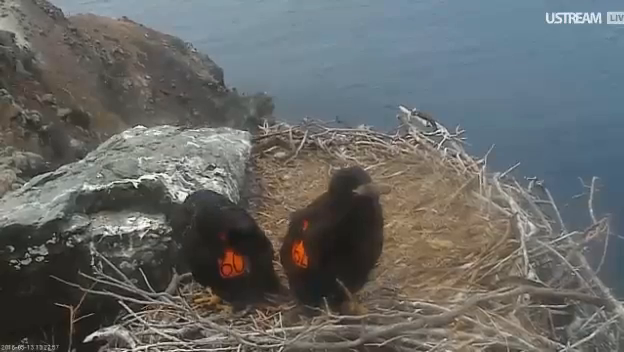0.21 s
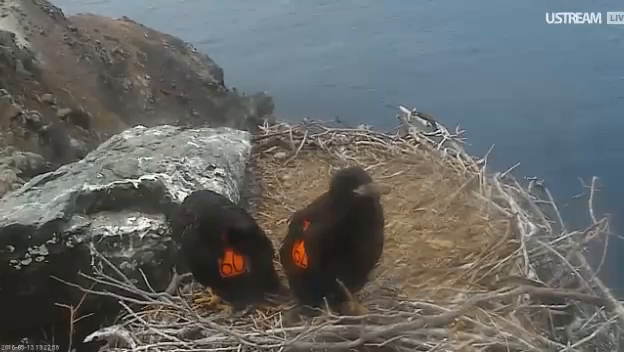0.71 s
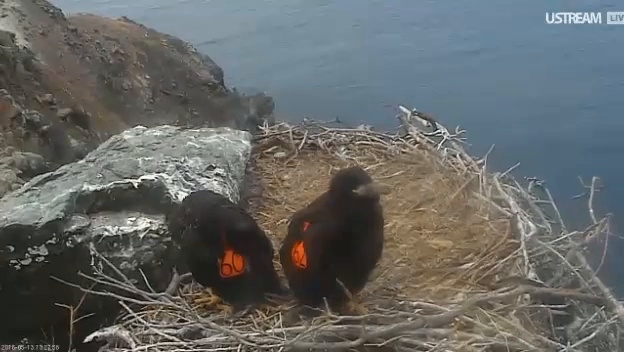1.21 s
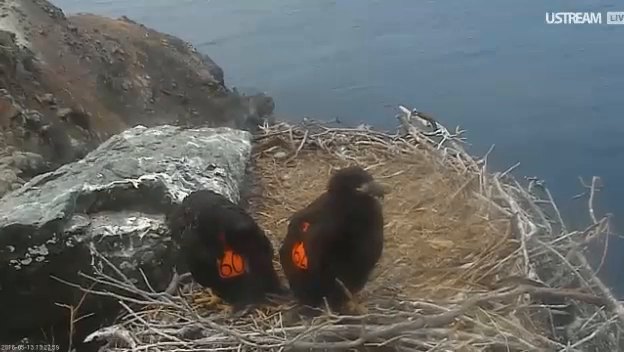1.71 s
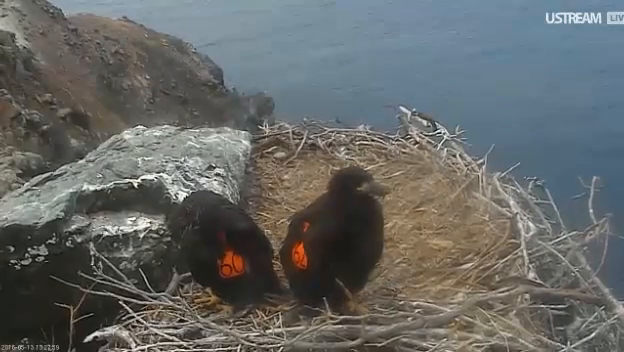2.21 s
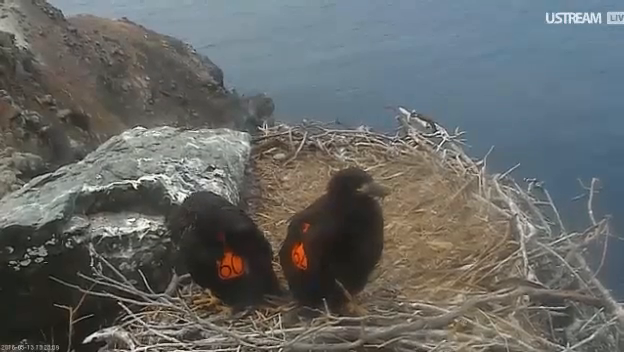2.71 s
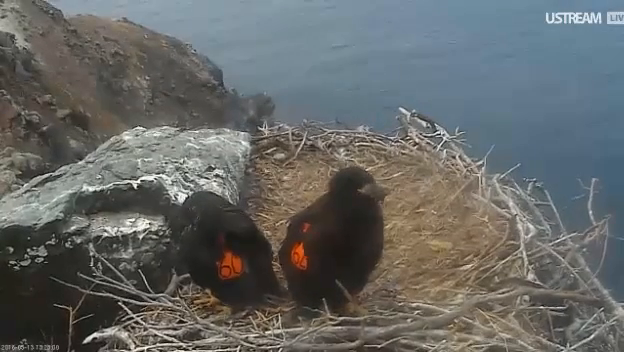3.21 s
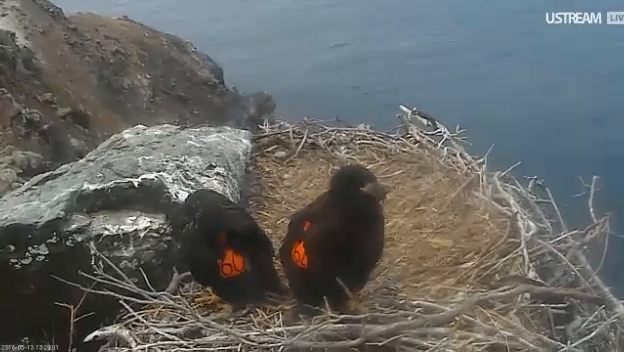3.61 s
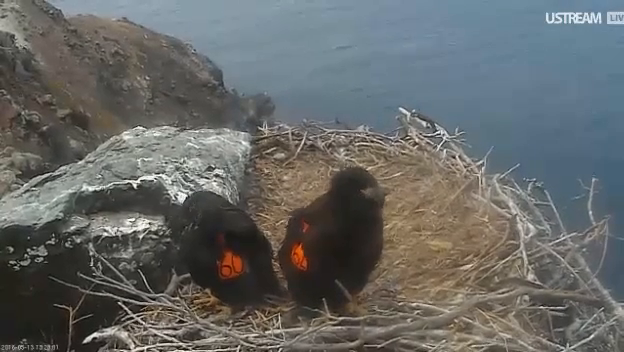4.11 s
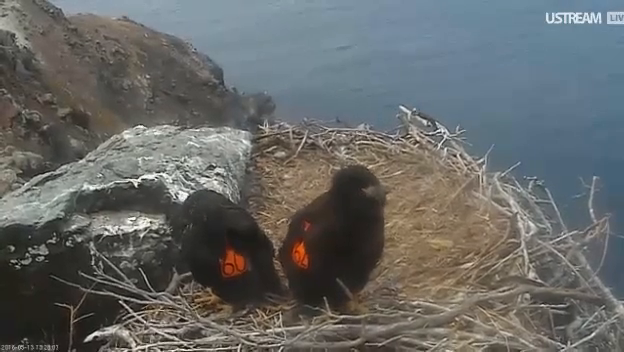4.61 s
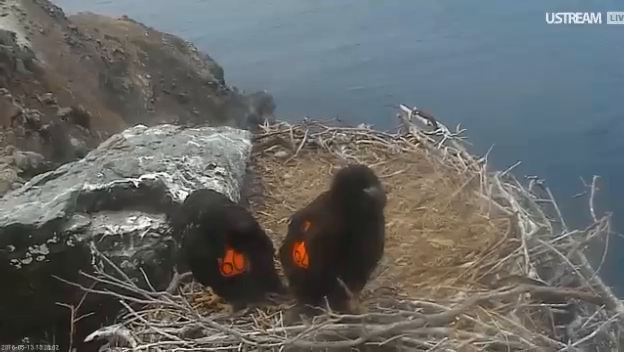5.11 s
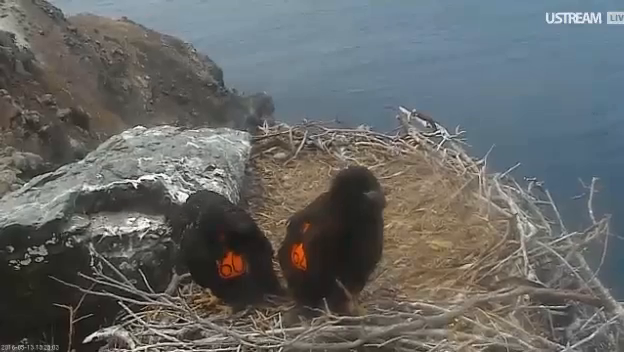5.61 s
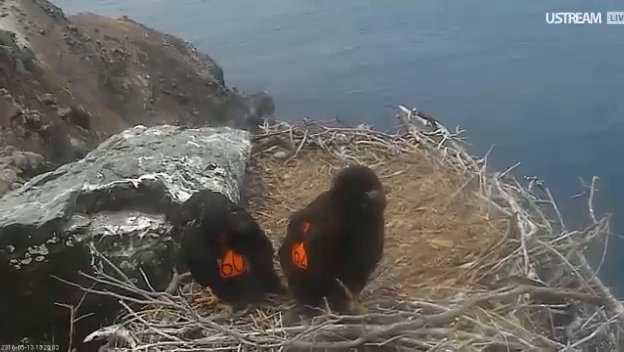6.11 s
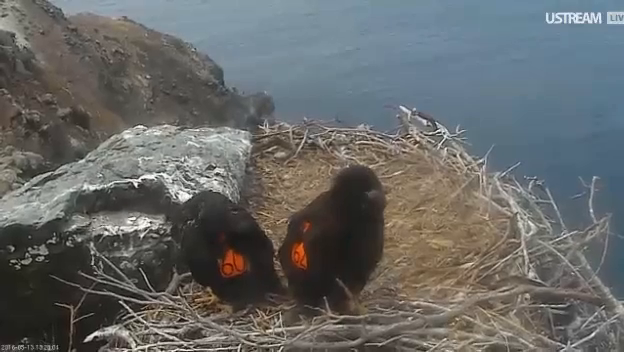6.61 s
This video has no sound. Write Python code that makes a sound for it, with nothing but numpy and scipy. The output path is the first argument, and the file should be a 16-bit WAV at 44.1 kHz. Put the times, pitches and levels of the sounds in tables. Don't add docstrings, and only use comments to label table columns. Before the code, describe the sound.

A nearly silent line of soft low hiss is interrupted by brittle loose-contact crackles, densest in the first second, then scattered.

```python
import sys
import numpy as np
from scipy import signal
from scipy.fft import rfft, irfft, next_fast_len
from scipy.io import wavfile
from scipy.ndimage import uniform_filter1d

SR = 44100
rng = np.random.default_rng(int(sys.argv[2]) if len(sys.argv) > 2 else 0)


def master(y):
    cut = np.clip(np.atleast_2d(y).T, -1, 1)
    pcm = np.round(cut * 32767)
    wavfile.write(sys.argv[1], SR, pcm.astype(np.int16))


def level_to_linear(level):
    exponent = np.asarray(level, float) / 20
    return 10 ** exponent


N = 303849

# (frequency [Hz], density [dB per Hz])
HISS_SPECTRUM = [(4, -12.5), (9, 6), (24, 1), (60, -5.5), (170, -9.5), (480, -14), (10000, -30),
                 (13400, -53)]
HISS_DB = -61.5
SWELL_DB, SWELL_S, SWELL_HZ = 1.5, 0.3, 250

# (time [s], length [ms], level at 3-11 kHz [dB], level above [dB])
PUFFS = [(.28, 3, -49, -73), (.2845, 3, -58, -73), (0.2938, 4, -49, -85), (0.2975, 1.9, -58, -86),
         (.4407, 1, -60, -51), (.462, 2, -67.5, -72), (.527, 4, -57, -73), (.535, 10, -61, -86),
         (.5415, 1.5, -41.5, -55.5), (.5475, 2, -57, -68), (0.561, 6.1, -49, -91), (0.5644, 1.6, -49, -52),
         (0.572, 2, -49, -68), (.577, 3, -55, -75), (0.586, 7, -46, -95.5), (.622, 3, -57.5, -89),
         (1.7985, 3, -50, -57), (3.219, 6.5, -60, -61), (3.5286, 1, -77, -76), (3.785, 0.89, -60, -68),
         (3.8185, 2, -61, -74), (4.5385, 2.5, -57.5, -53.5), (4.567, 8, -52.5, -95.5),
         (5.8933, 1.12, -60, -64)]
# (time [s], length [ms], level at 1-3 kHz [dB])
DULL_PATCHES = [
    (.272, 7.4, -60),
    (.45, 12, -68),
    (.535, 10, -51),
    (.571, 5.9, -48),
    (.584, 14, -47),
    (.614, 13, -55),
    (3.231, 16, -63.5),
    (4.566, 6.8, -60.5),
    (5.905, 17, -61.5),
]

# (time [s], time held shut [ms])
TOUCHES = [
    (.24538, 39.61),
    (.42827, 12.45),
    (.47693, 129.39),
    (1.79113, 8.38),
    (3.15518, 66.13),
    (3.52857, 6.94),
    (3.7187, 3.47),
    (3.78497, 33.14),
    (4.51734, 42.3),
    (5.8806, 12.7),
]
# (time [s], time open [ms])
LIFTS = [(.25374, .26), (.25876, .62), (.28094, 2.59), (.42857, .145), (.47723, .19), (.4819, .345),
         (.50305, .6), (.50405, .034), (.59847, .19), (.6056, .02), (1.79524, .095), (1.79848, .1),
         (3.15663, .04), (3.15964, .66), (3.16057, .67), (3.21473, .175), (3.53375, .18), (3.80445, .39),
         (3.81775, .17), (4.52922, .3), (4.53195, .38), (4.54475, .54), (5.88082, .13), (5.88446, .16),
         (5.88514, .06), (5.88844, .98)]
# (time [s], time open [ms], time shut [ms], time open again [ms])
BOUNCED_LIFTS = [(.24589, .076, .4, .076), (.25742, .2, .37, .06), (.25964, .06, .4, .37),
                 (.27892, .146, .264, .76), (.28373, .11, .61, .12), (.56386, .07, .29, .23),
                 (.57456, .09, .35, .63), (.58961, .04, .4, 1.3), (.5964, .13, .55, .02),
                 (.60001, .02, .43, .32), (.60209, .03, .42, .15), (.60316, .025, .425, .11),
                 (1.79156, .07, .33, .14), (1.79434, .015, .37, .26), (1.79761, .11, .26, .22),
                 (3.16542, .14, .22, .06), (3.53424, .06, .03, .346), (3.53474, .1, .04, .1),
                 (3.53503, .043, .067, .33), (3.78646, .074, .274, .074), (3.8051, .15, .32, .1),
                 (4.54555, .056, .335, .056), (4.54635, .15, .34, 2.82), (4.54989, .095, .3, .095),
                 (4.55101, .05, .59, .05), (5.88574, .12, .29, .04), (5.88656, .205, .295, .13),
                 (5.8875, .03, .47, .19)]
# (time [s], number of breaks [count], mean spacing [ms], typical time open [ms])
CHATTER_RUNS = [(.47764, 14, .303, .058), (.48245, 12, .319, .05), (.48873, 9, .34, .06),
                (.49186, 13, .395, .052), (.49707, 14, .394, .063), (.50563, 8, .446, .05),
                (.51614, 9, .404, .065), (.52515, 9, .409, .06), (.547, 3, .42, .085),
                (.57588, 6, .396, .09), (.59393, 4, .397, .1), (1.79637, 4, .311, .082),
                (3.21513, 6, .31, .078), (3.217, 8, .316, .057), (3.21957, 5, .342, .068),
                (3.78534, 3, .308, .06), (4.51761, 9, .357, .064), (4.52075, 9, .336, .046),
                (4.52385, 8, .346, .063), (4.52972, 6, .38, .055), (4.53262, 11, .403, .055),
                (4.53825, 3, .435, .057), (4.5431, 4, .433, .06), (4.55284, 4, .397, .06),
                (4.5555, 5, .412, .06), (5.88122, 3, .476, .02), (5.88273, 4, .435, .025)]
FASTEST_MS = 0.3
SHUT_SPREAD, OPEN_SPREAD = 0.054, 0.19
SLACK = 1.0

# (edge [Hz], tail [share], tail corner [Hz], slow tail [share], slow tail corner [Hz])
BREAK_SHAPE = (10100, 2.0, 2900, .25, 200)
# (edge [Hz], tail [share], tail corner [Hz], slow tail [share], slow tail corner [Hz])
CLOSE_SHAPE = (8100, .24, 1250, .17, 115)
BREAK_DB, CLOSE_DB = -12.1, -5.5
FINE = 4


def hiss(hz):
    points_hz, points_db = np.transpose(HISS_SPECTRUM)
    colour = level_to_linear(np.interp(np.log(hz + 1), np.log(points_hz), points_db))
    spectrum = rfft(rng.standard_normal(next_fast_len(N))) * colour * (hz > 5)
    bass = irfft(spectrum / (1 + (hz / SWELL_HZ) ** 2))
    size = int(SWELL_S * SR)
    wander = uniform_filter1d(rng.standard_normal(len(bass)), size)
    wander = uniform_filter1d(wander, size)
    swell = level_to_linear(SWELL_DB * wander / np.std(wander))
    noise = irfft(spectrum) + bass * (swell - 1)
    return noise * level_to_linear(HISS_DB) / np.std(noise)


def band_noise(lo_hz, hi_hz, order=8):
    edges = signal.butter(order, [lo_hz, hi_hz], "band", fs=SR, output="sos")
    noise = signal.sosfilt(edges, rng.standard_normal(N))
    return noise / np.std(noise)


def humps(rows):
    t = np.arange(N) / SR
    envelope = np.zeros(N)
    for s, length_ms, db in rows:
        near = slice(int((s - 0.03) * SR), int((s + 0.03) * SR))
        half_lengths = 2000 * (t[near] - s) / length_ms
        envelope[near] += level_to_linear(db) * np.exp(-half_lengths ** 4)
    return envelope


def puffs():
    rows = np.array(PUFFS)
    middle = humps(rows[:, :3]) * band_noise(2900, 10200, order=12)
    top = humps(np.delete(rows, 2, axis=1)) * band_noise(10500, 13000, order=2)
    dull = humps(DULL_PATCHES) * band_noise(900, 3000)
    return middle + top + dull


def smear(x, reach_ms, db, noise):
    size = max(int(reach_ms * SR / 1000), 1)
    power = uniform_filter1d(x ** 2, size)
    power = uniform_filter1d(power, size, origin=size // 3)
    return level_to_linear(db) * np.sqrt(np.maximum(power, 0)) * noise


def chatter():
    start, open_ms = [], []
    chance = rng.standard_normal((len(CHATTER_RUNS), 30, 2))
    for (s, count, spacing_ms, typical_ms), draw in zip(CHATTER_RUNS, chance):
        loose = SLACK * (spacing_ms - FASTEST_MS)
        lifted = typical_ms * np.exp((OPEN_SPREAD + 2 * loose) * draw[:count, 0])
        lifted = np.minimum(lifted, spacing_ms - 0.03)
        shut = (spacing_ms - typical_ms) * np.exp((SHUT_SPREAD + loose) * draw[:count, 1])
        cycle = lifted + shut
        since = np.cumsum(cycle) - cycle
        start.append(s + since * spacing_ms * (count - 1) / since[-1] / 1000)
        open_ms.append(lifted)
    return np.concatenate(start), np.concatenate(open_ms)


def contact():
    touch, held_ms = np.transpose(TOUCHES)
    first, first_ms, shut_ms, second_ms = np.transpose(BOUNCED_LIFTS)
    lift, lift_ms = np.transpose(LIFTS)
    run, run_ms = chatter()
    second = first + (first_ms + shut_ms) / 1000
    start = np.concatenate([lift, first, second, run])
    open_ms = np.concatenate([lift_ms, first_ms, second_ms, run_ms])
    broken = np.append(start, touch + held_ms / 1000)
    closed = np.append(start + open_ms / 1000, touch)
    return broken, closed


def spikes(seconds, db):
    size = next_fast_len(N)
    fine = np.zeros(FINE * size)
    inside = seconds[(seconds > 0) & (seconds < N / SR)]
    at = np.round(inside * SR * FINE).astype(int)
    np.add.at(fine, at, level_to_linear(db))
    return rfft(fine)[:size // 2 + 1]


def coupling(hz, edge_hz, tail, tail_hz, slow, slow_hz):
    spike = 1 / (1 + 1j * hz / edge_hz) ** 2
    short_tail = tail / (1 + 1j * hz / tail_hz)
    slow_tail = slow / (1 + 1j * hz / slow_hz)
    return spike + short_tail + slow_tail


def clicks(hz):
    broken, closed = contact()
    down = spikes(broken, BREAK_DB) * coupling(hz, *BREAK_SHAPE)
    up = spikes(closed, CLOSE_DB) * coupling(hz, *CLOSE_SHAPE)
    return up - down


def scene():
    hz = np.fft.rfftfreq(next_fast_len(N), 1 / SR)
    return (hiss(hz) + irfft(clicks(hz)))[None, :N]


def low_pass(x):
    return signal.sosfilt(signal.butter(12, 16000, fs=SR, output="sos"), x)


def record(dry):
    x = dry + smear(dry, 1.5, db=-28, noise=band_noise(2800, 11000))
    x = x + smear(dry, 16.0, db=-36.5, noise=band_noise(400, 2800))
    hz = np.fft.rfftfreq(N, 1 / SR)
    cut = np.clip((11050 - hz) / 1050, 0, 1)
    x = irfft(rfft(x) * np.sin(np.pi / 2 * cut) ** 2, N)
    x = x + puffs()
    x = x + smear(dry, 1.5, db=-54.5, noise=band_noise(10600, 11800, order=4))
    return low_pass(x)


dry = scene()
out = record(dry)
master(out)
```